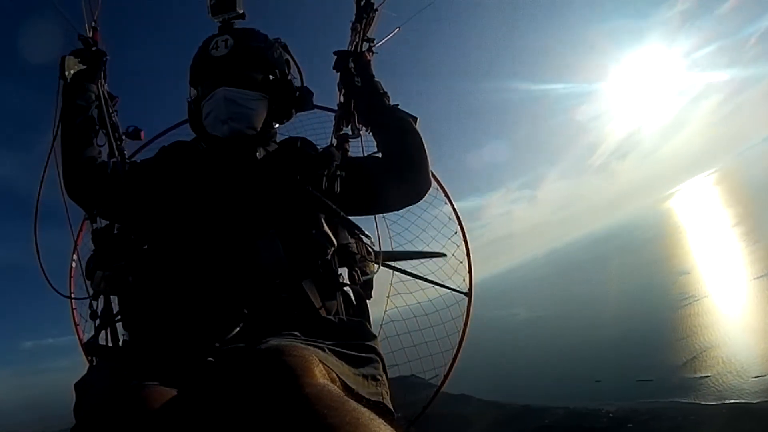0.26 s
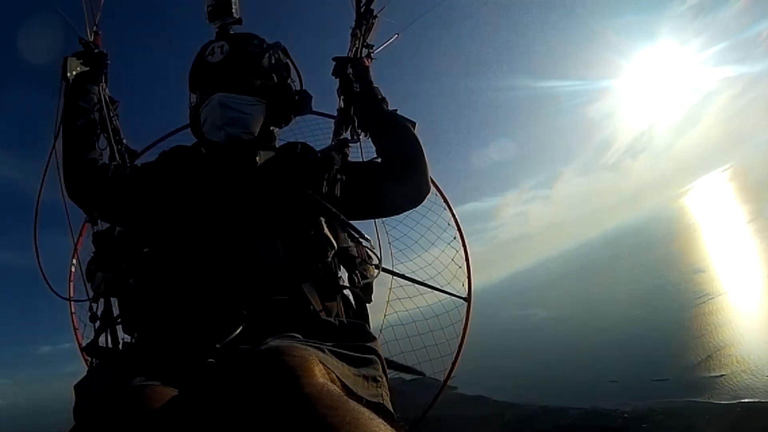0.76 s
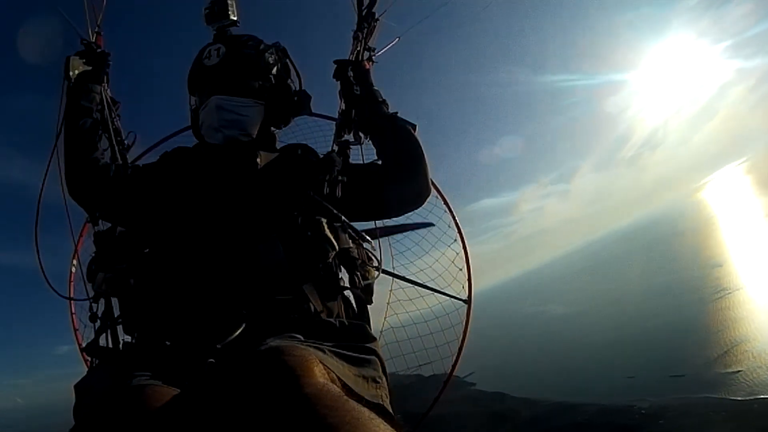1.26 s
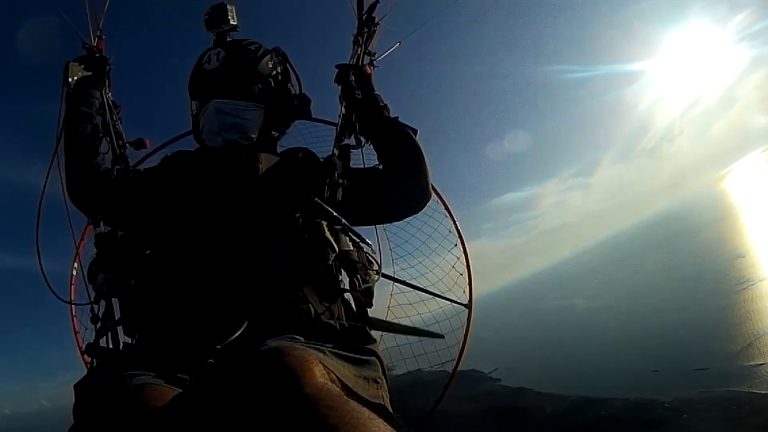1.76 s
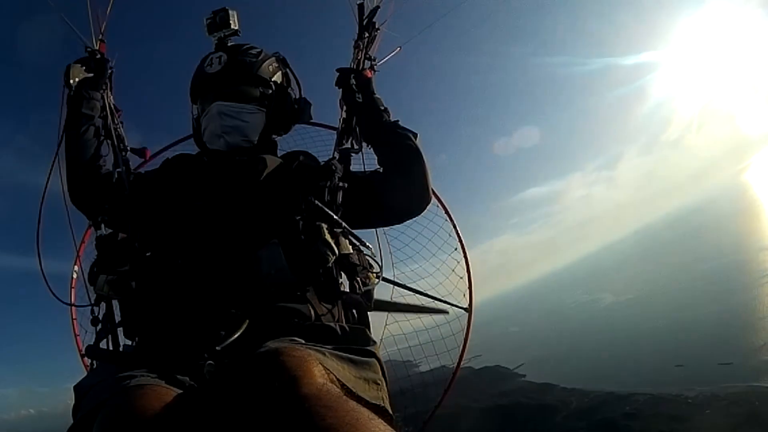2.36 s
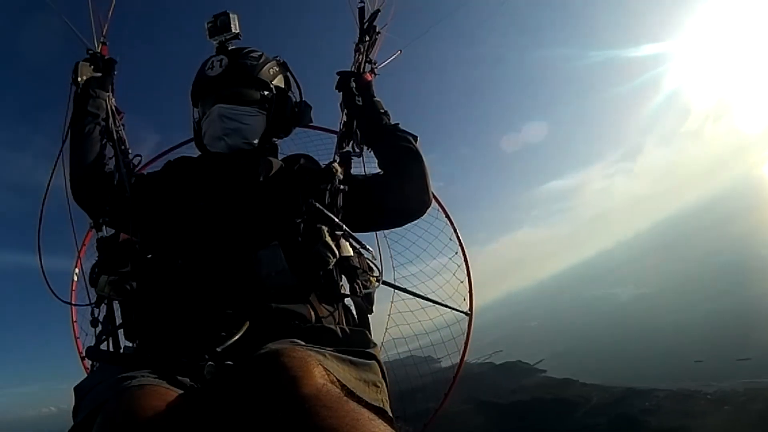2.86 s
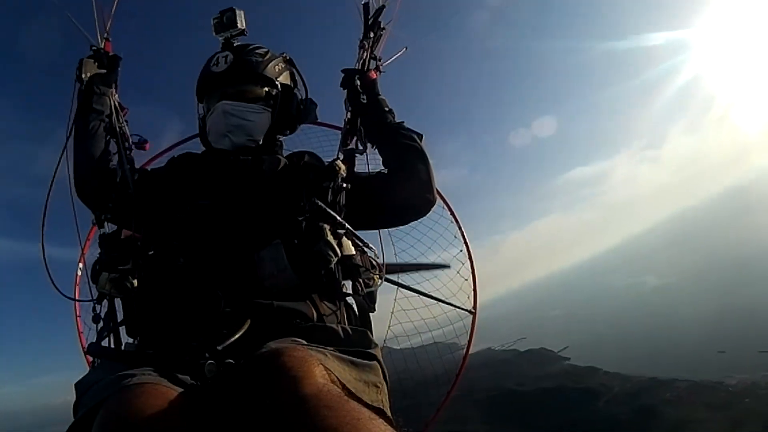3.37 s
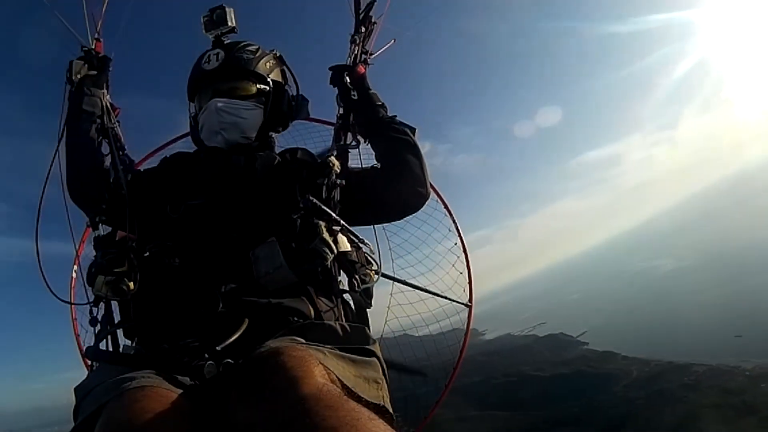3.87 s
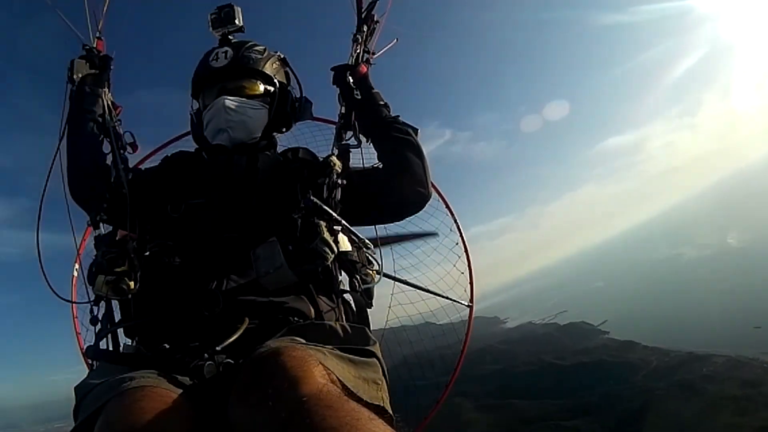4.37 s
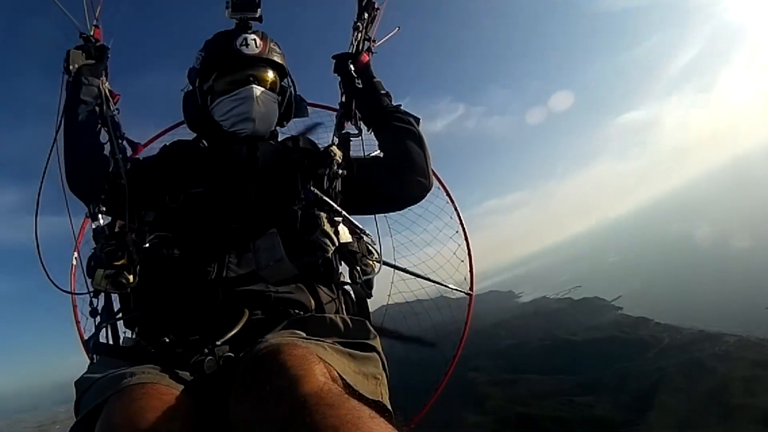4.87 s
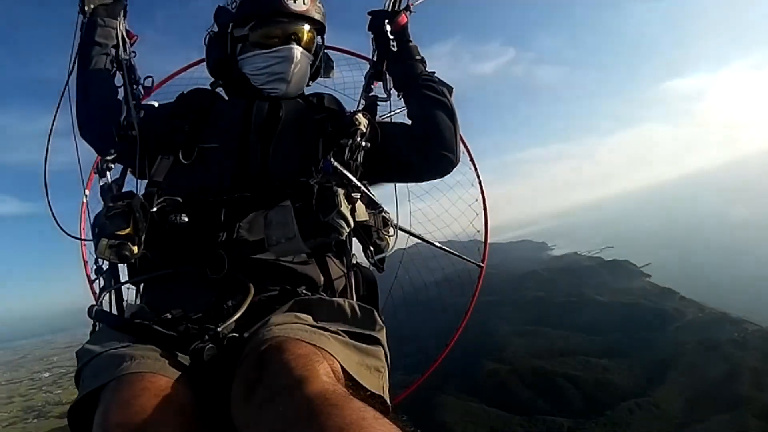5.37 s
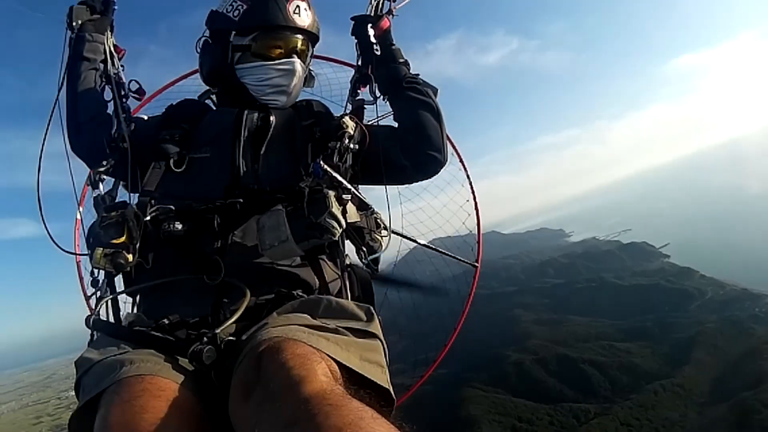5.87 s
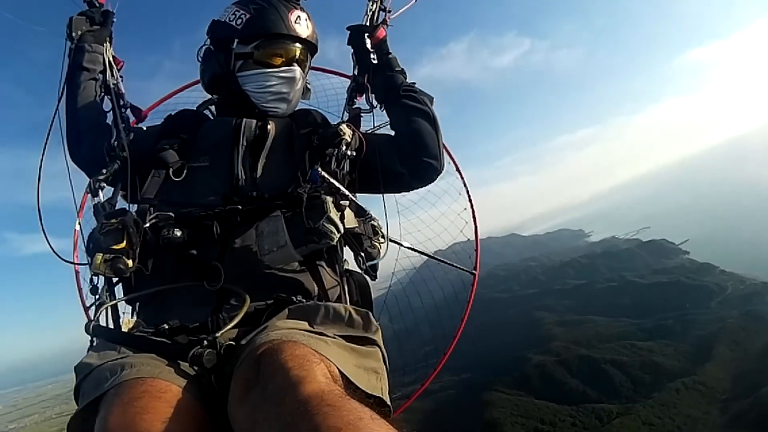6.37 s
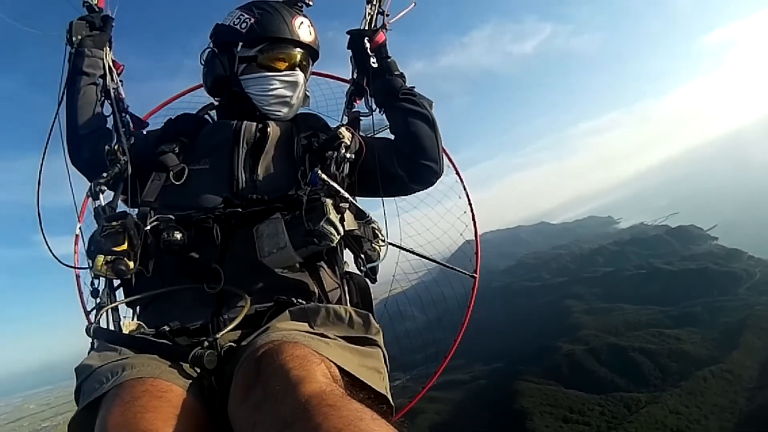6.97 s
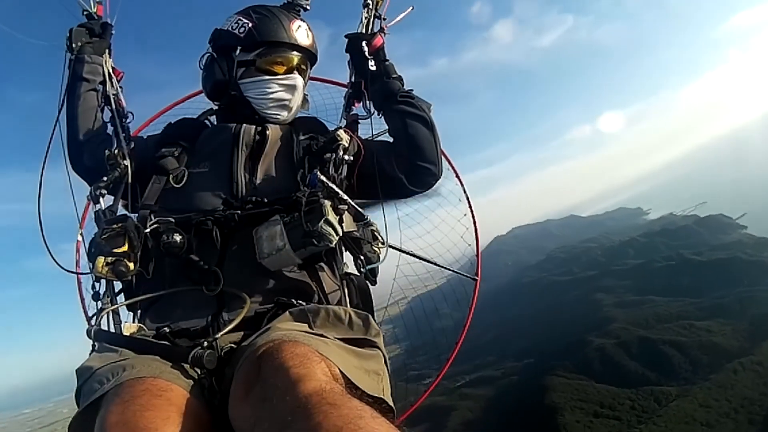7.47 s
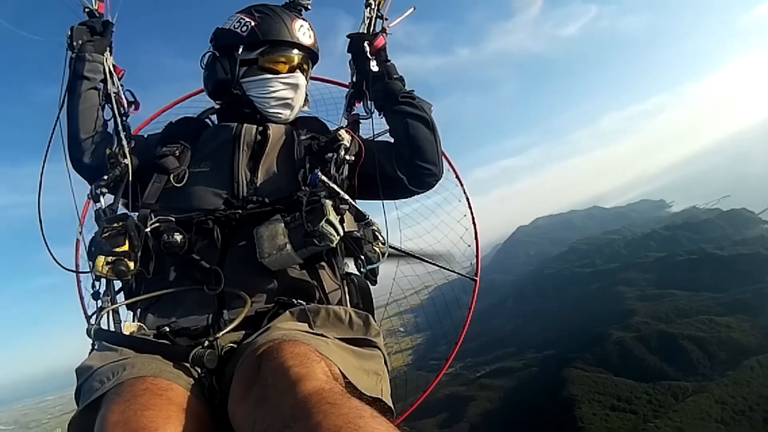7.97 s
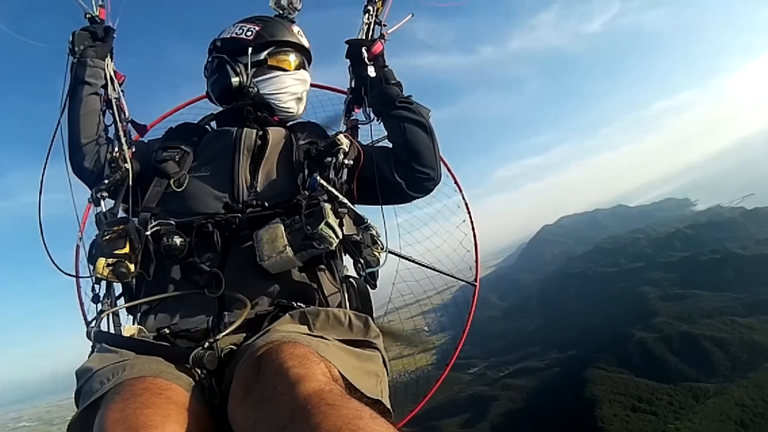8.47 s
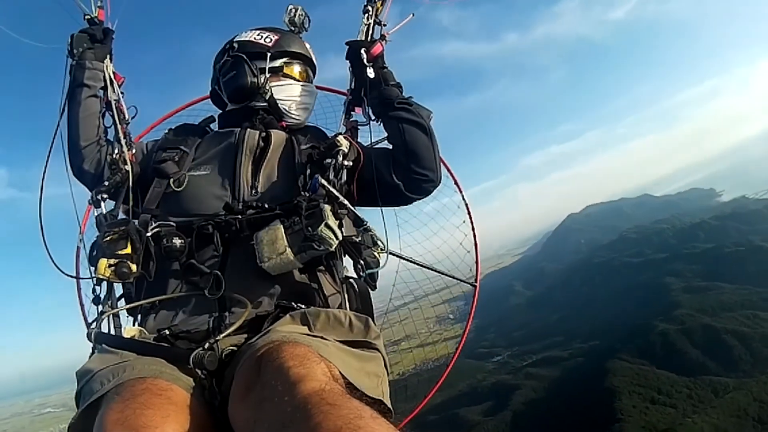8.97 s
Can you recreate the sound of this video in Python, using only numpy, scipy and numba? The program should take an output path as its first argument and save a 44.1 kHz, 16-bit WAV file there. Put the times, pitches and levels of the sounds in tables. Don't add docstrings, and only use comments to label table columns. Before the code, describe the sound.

Continuous close paramotor drone, already running at the start and unbroken to the end. Engine buzz and propeller hum interlock into a dense, nasal, throbbing tone with boxy airy noise around it. Gusts rumble softly underneath, strongest before the middle, quieter later. The housed microphone dulls the highs; outdoors, with no room echo, only a small change of colour during a turn.

```python
import sys
import numpy as np
from scipy import signal
from scipy.fft import rfft, irfft, next_fast_len
from scipy.io import wavfile
from scipy.ndimage import uniform_filter1d
from numba import njit

SR = 44100
rng = np.random.default_rng(int(sys.argv[2]) if len(sys.argv) > 2 else 0)


def ratio_of_db(decibels):
    return 10 ** (np.asarray(decibels, float) / 20)


def transcribe(u):
    v = np.clip(np.atleast_2d(u).T, -1, 1)
    q = np.round(v * 32767).astype(np.int16)
    wavfile.write(sys.argv[1], SR, q)


N = 406161

# (time [s], blade pass rate [Hz])
THROTTLE = [(0, 65.03), (.35, 65.02), (.65, 64.93), (1.03, 65.11), (1.45, 65.22), (2.42, 65.15),
            (2.76, 65.23), (3.6, 65.22), (4.95, 65.09), (5.3, 65.14), (6.1, 65.08), (6.8, 65.14),
            (7.02, 65.07), (7.36, 65.41), (7.8, 65.38), (8.3, 65.52), (9.21, 65.31)]
# (upright rms [dB], leaned rms [dB])
BLADE_TONES = [(-46, -51), (-47, -46), (-43, -45), (-52, -58), (-44, -50), (-55, -53), (-49, -47),
               (-57, -55), (-42, -41), (-47, -44), (-47, -47), (-50, -49), (-46, -43), (-44, -42),
               (-44, -42), (-57, -54), (-46, -49), (-44, -41), (-43, -43), (-52, -48), (-44, -46),
               (-41, -39), (-35, -38), (-41, -42), (-48, -47), (-44, -41), (-49, -54), (-53, -48),
               (-50, -43), (-52, -60)]
# (frequency [Hz], level [dB])
BLADE_PULSE_SPECTRUM = [(2000, -50), (2100, -50), (2200, -33.5), (2350, -38.5), (2600, -37), (2900, -37),
                        (3350, -44.5), (4500, -42)]
FIRING_TONES = [-44.1, -53.0, -46.1, -53.2, -42.9, -62.9, -53.7, -58.4, -52.3, -51.5, -41.5, -37.5, -39.5,
                -52.8, -46.8, -46.0]
# (firing multiple, added propeller shaft multiple, rms [dB])
CHOPPED_EXHAUST = [(0, 1, -58.9), (1, -2, -55.2), (1, 2, -63.2), (1, 4, -46.4), (1, 5, -56.0),
                   (1, 6, -47.7), (2, -2, -56.9), (2, 1, -59.9), (2, 2, -40.2), (2, 4, -48.6),
                   (2, 6, -57.7), (2, 8, -63.8), (3, -2, -52.1), (3, -1, -60.1), (3, 2, -55.0),
                   (3, 4, -57.2), (4, -4, -60.3), (4, -2, -63.4), (4, 2, -47.9), (4, 4, -54.6),
                   (4, 6, -50.3), (4, 8, -57.6), (5, -2, -52.8), (5, 2, -46.8), (5, 8, -59.1),
                   (6, 2, -53.9), (7, 2, -58.6), (8, 2, -51.5), (8, 4, -56.9)]
# (firing multiple, rms [dB])
WOBBLE_SIDEBANDS = [(5, -64), (10, -51), (12, -43.5), (13, -48.5), (14, -51)]
# (frequency [Hz], gain [dB])
HOUSING_WALL = [(20, -18.5), (400, -13.5), (600, -10), (780, -9.5), (1250, -7.5), (1750, -18.5),
                (2100, -28), (2600, -41), (3330, -50), (4300, -43), (5900, -44.5), (9500, -51),
                (14800, -55.5), (15600, -63)]
# (frequency [Hz], width [Hz], gain [dB])
HOUSING_MODES = [(1528, 285, -1), (1895, 284, -8), (2247, 404, -16), (2886, 190, -23.5), (3074, 178, -18.5),
                 (3550, 106, -28), (3870, 410, -27), (4034, 240, -30.5), (4530, 220, -35),
                 (4990, 370, -38.5), (5450, 120, -43), (7720, 780, -47), (10820, 1200, -49.5)]
# (delay after exhaust [blade periods], slap [dB], hiss [dB])
CAGE_STRUTS = [
    (0, 3.5, -8),
    (.11, -1, 1),
    (.24, -21, -5),
    (.68, -9, -7),
    (.86, -16, -7),
]
# (time [s], gust [dB])
GUSTS = [
    (0, 1),
    (.3, -2.5),
    (2.3, 0),
    (2.9, 0.5),
    (3.6, 3.5),
    (4.6, -1),
    (5.3, 1.5),
    (6.8, -9.5),
    (8.0, -3.5),
    (9.21, -8.5),
]
# (time [s], share of new angle [0-1])
CAMERA_LEAN = [
    (0, .2),
    (1.5, .1),
    (3.2, -.15),
    (4.8, 0),
    (5.5, .2),
    (5.9, 1.05),
    (7.4, 1.05),
    (9.21, .8),
]
# (frequency [Hz], gain [dB])
LEAN_TINT = [(60, 0.5), (130, 1), (450, 0.5), (700, 0.1), (900, 0.5), (1050, 1.8), (1180, -1), (1500, 1.5),
             (1750, 0), (1890, 2), (2050, 2), (3000, 1), (6000, 0.5)]
# (frequency [Hz], rms [dB])
WHINE_TONES = [(11679.7, -98), (11770.6, -93), (11861.4, -84), (11906.5, -88), (11952.3, -84),
               (12043.1, -92), (12134, -97)]

CRANK_PER_BLADE, WOBBLE_PER_BLADE = 73 / 38, .425
CRANK_START_TURNS = .748
EXHAUST_AT = .45
BASS_LATE = .5
BLADE_COUNT, FIRING_COUNT = 69, 32
ECHO_SCATTER_DB = 2
FIRING_PULSE_DB = -45
HUNT_HZ, HUNT_PER_S = .03, 4
WIND_DB, WASH_DB, WASH_PER_GUST = -48, -29, 0.12
MIRROR_HZ = 16000
HOP = 2048


def walk(rate_hz):
    hold = int(SR / rate_hz)
    steps = np.repeat(rng.standard_normal(N // hold + 1), hold)
    return 1.046 * uniform_filter1d(uniform_filter1d(steps, hold), hold)[:N]


def unit(x):
    return x / np.sqrt(np.mean(x ** 2))


def shaped(x, gain):
    size = next_fast_len(N + 2 * HOP)
    spectrum = rfft(np.pad(x, HOP, mode="reflect"), size)
    hz = np.arange(1, size // 2 + 2) * SR / size
    return irfft(spectrum * gain(hz), size)[HOP:HOP + N]


def log_curve(hz, table):
    at_hz, db = np.transpose(table)
    return np.interp(np.log(hz), np.log(at_hz), db)


def mean_blade_hz():
    return np.mean(np.transpose(THROTTLE)[1])


def housing(hz):
    power = ratio_of_db(log_curve(hz, HOUSING_WALL)) ** 2
    for mode_hz, width_hz, mode_db in HOUSING_MODES:
        power = power + ratio_of_db(mode_db) ** 2 / (1 + ((hz - mode_hz) / width_hz * 2) ** 2) ** 2
    return np.sqrt(power)


def ringing(hz):
    grid_hz = np.linspace(1, SR / 2, 2049)
    log_gain = np.log(housing(grid_hz))
    two_sided = np.r_[log_gain, log_gain[-2:0:-1]]
    lag_rad = -np.imag(signal.hilbert(two_sided))[:len(grid_hz)]
    return np.interp(hz, grid_hz, lag_rad)


def housed(count, rate_hz, pulse_db, first):
    hz = np.arange(first, count + 1) * rate_hz
    return pulse_db(hz) + 20 * np.log10(housing(hz))


@njit
def tones(turns, multiple, size, phase, hop, cosine):
    out = np.zeros(len(turns))
    for k in range(len(multiple)):
        for i in range(len(turns)):
            j, f = i // hop, (i % hop) / hop
            a = size[k, j] + f * (size[k, j + 1] - size[k, j])
            drift = phase[k, j] + f * (phase[k, j + 1] - phase[k, j])
            p = multiple[k] * turns[i] + drift / (2 * np.pi)
            out[i] += a * cosine[int((p - np.floor(p)) * (len(cosine) - 1))]
    return out


def partials(turns, multiple, db, start_rad, drift_db, drift_rad):
    noise = rng.standard_normal((2, len(db), N // HOP + 2))
    slow = uniform_filter1d(noise, size=9, axis=2) * 3
    height = (multiple / 25)[:, None] ** .8
    size = np.sqrt(2) * ratio_of_db(db + drift_db * height * slow[0])
    phase = start_rad[:, None] + drift_rad * height * slow[1]
    cosine = np.cos(np.linspace(0, 2 * np.pi, 2 ** 15))
    return tones(turns, 1. * multiple, size, phase, HOP, cosine)


def blades(turns):
    k, rate_hz = np.arange(1, BLADE_COUNT + 1), mean_blade_hz()
    upper_db = housed(BLADE_COUNT, rate_hz, lambda hz: log_curve(hz, BLADE_PULSE_SPECTRUM), len(BLADE_TONES) + 1)
    upper_db = upper_db[:, None] + ECHO_SCATTER_DB * rng.standard_normal((len(upper_db), 2))
    upright_db, leaned_db = np.vstack([BLADE_TONES, upper_db]).T[:, :, None]
    lean = np.interp(np.arange(N // HOP + 2) * HOP / SR, *np.transpose(CAMERA_LEAN))
    level_db = upright_db + lean * (leaned_db - upright_db)

    bass = 1 / (1 + (k / 17.) ** 6)
    scatter_rad = rng.standard_normal(len(k)) * (.35 + 1.2 * bass)
    late = BASS_LATE * bass + k / 2 * (k < 8)
    start_rad = ringing(k * rate_hz) + scatter_rad - 2 * np.pi * np.cumsum(late)
    start_rad = start_rad - 2 * np.pi * k * (EXHAUST_AT + .03)
    return partials(turns, k, level_db, start_rad, drift_db=1.1, drift_rad=.25), start_rad


def engine(turns, blade_phase_rad):
    fire, shaft, chop_db = np.transpose(CHOPPED_EXHAUST)
    shaken, wobble_db = np.transpose(WOBBLE_SIDEBANDS)
    rate_hz = CRANK_PER_BLADE * mean_blade_hz()
    upper_db = housed(FIRING_COUNT, rate_hz, lambda hz: FIRING_PULSE_DB, len(FIRING_TONES) + 1)
    level_db = np.r_[FIRING_TONES, upper_db, chop_db, wobble_db][:, None]
    crank = np.r_[np.arange(1, FIRING_COUNT + 1), np.round(fire), np.round(shaken)]
    shift = np.r_[np.zeros(FIRING_COUNT), np.round(shaft) / 2, -WOBBLE_PER_BLADE * np.ones(len(shaken))]

    nearest = np.ceil(2 * crank + shift).astype(int) - 1
    start_rad = blade_phase_rad[nearest] + 2 * np.pi * crank * CRANK_START_TURNS
    start_rad = start_rad + np.pi * crank * (crank + 1) / 2
    start_rad[:2] += np.pi
    start_rad += np.pi * (crank * shift >= 4)
    multiple = crank * CRANK_PER_BLADE + shift
    return partials(turns, multiple, level_db, start_rad, drift_db=1.5, drift_rad=0.38)


def wash(turns, level_db):
    noise = unit(shaped(rng.standard_normal(N) * ratio_of_db(0.67 * walk(13.0)), housing))
    treble = shaped(noise, lambda hz: 1 / (1 + (7100.0 / hz) ** 4))
    middle = shaped(noise, lambda hz: 1 / (1 + ((hz - 1050) / 230.0) ** 4))
    since_exhaust = (turns - EXHAUST_AT) % 1
    shade = .45 * np.exp(-((since_exhaust - .18) / .09) ** 2)
    body = (noise - treble - shade * middle) * ratio_of_db(level_db - 1.0)
    return body + treble * ratio_of_db(np.mean(level_db) - 1.05)


def bursts(turns, levels_db, rise, fall, scatter_db):
    gate = 0
    for after, db in zip(np.transpose(CAGE_STRUTS)[0], levels_db):
        since = (turns - EXHAUST_AT - after) % 1
        which = np.floor(turns - EXHAUST_AT - after + 2).astype(int)
        scatter = np.clip(rng.standard_normal(int(turns[-1]) + 3), -2, 1.7)
        size = ratio_of_db(db + scatter_db * scatter)[which]
        gate = gate + size * (1 - np.exp(-since / rise)) * np.exp(-since / fall)
    return rng.standard_normal(N) * gate


def swish(turns):
    def slap_band(hz):
        rung = housing(hz) * np.exp(1j * ringing(hz))
        return rung / (1 + (3560.0 / hz) ** 3.32) / (1 + (hz / 4600.0) ** 6)

    def hiss_band(hz):
        return housing(hz) / (1 + (4600.0 / hz) ** 6)

    _, slap_db, hiss_db = np.transpose(CAGE_STRUTS)
    slap = unit(shaped(bursts(turns, slap_db, .015, .04, scatter_db=2.2), slap_band))
    hiss = unit(shaped(bursts(turns, hiss_db, .02, .06, scatter_db=1.2), hiss_band))
    return slap * ratio_of_db(-47.5) + hiss * ratio_of_db(-66.0)


def wind(level_db):
    band = lambda hz: (hz / 55.) ** 1.6 / (1 + (hz / 70.0) ** 3.26)
    buffeting = rng.standard_normal(N) * ratio_of_db(0.93 * walk(3.9))
    return unit(shaped(buffeting, band)) * ratio_of_db(level_db + 4.5)


def leaning(motor, t):
    leaned = shaped(motor, lambda hz: ratio_of_db(log_curve(hz, LEAN_TINT)))
    return motor + np.interp(t, *np.transpose(CAMERA_LEAN)) * (leaned - motor)


def mirror(x, t):
    source = shaped(x, lambda hz: 1 / (1 + (1800.0 / hz) ** 2.5))
    return source * ratio_of_db(-35.5) * np.cos(2 * np.pi * MIRROR_HZ * t)


def whine(t):
    out = 0
    for hz, db in WHINE_TONES:
        out = out + np.sqrt(2) * ratio_of_db(db) * np.cos(2 * np.pi * (hz * t + rng.random()))
    return out


def scene():
    t = np.arange(N) / SR
    blade_hz = np.interp(t, *np.transpose(THROTTLE)) + HUNT_HZ * walk(HUNT_PER_S)
    turns = np.cumsum(blade_hz) / SR
    gust_db = np.interp(t, *np.transpose(GUSTS))
    propeller, blade_phase_rad = blades(turns)
    motor = engine(turns, blade_phase_rad) + wash(turns, WASH_DB + WASH_PER_GUST * gust_db)
    return (leaning(motor, t) + propeller + swish(turns) + wind(WIND_DB + gust_db))[None]


def band_limit(x):
    return signal.sosfilt(signal.butter(12, 15660, fs=SR, output="sos"), x)


def record(dry):
    t = np.arange(N) / SR
    mix = dry + mirror(dry[0], t) + whine(t)
    return band_limit(mix)


dry = scene()
out = record(dry)
transcribe(out)
```